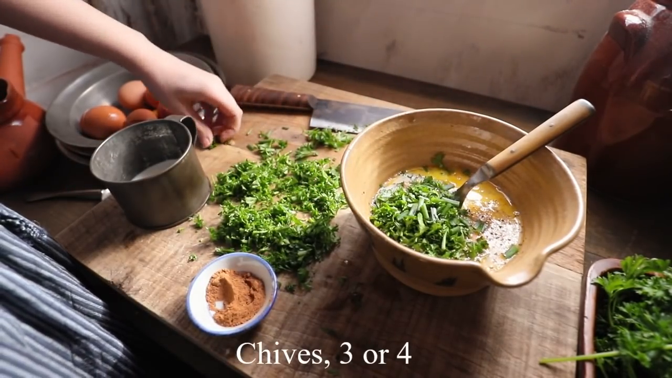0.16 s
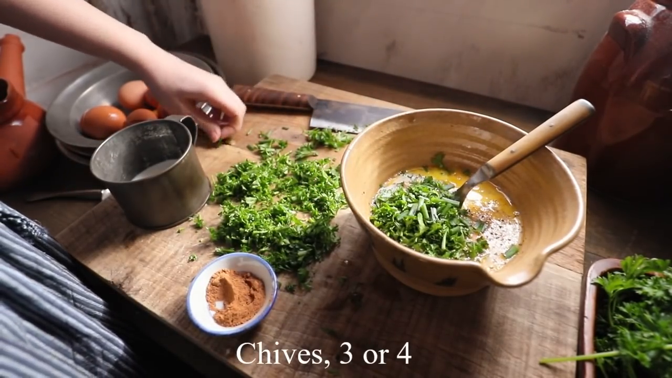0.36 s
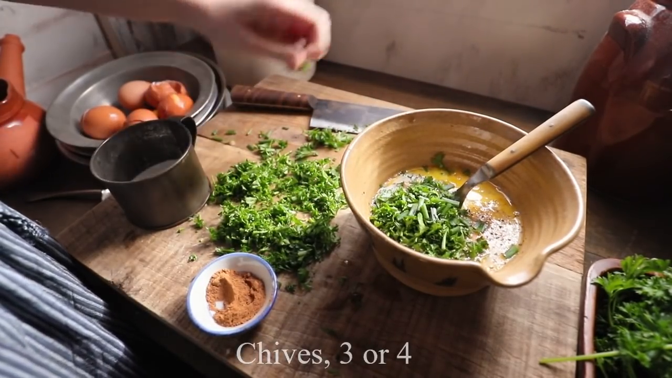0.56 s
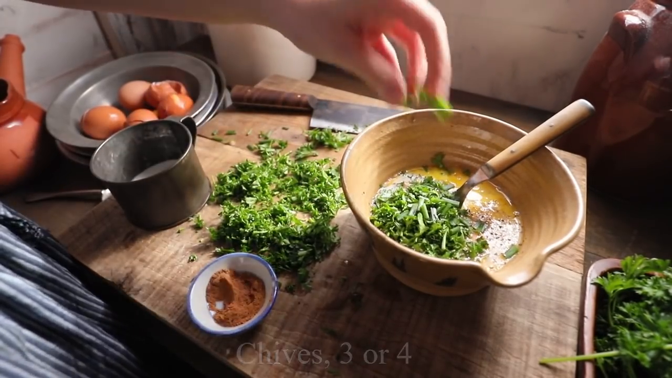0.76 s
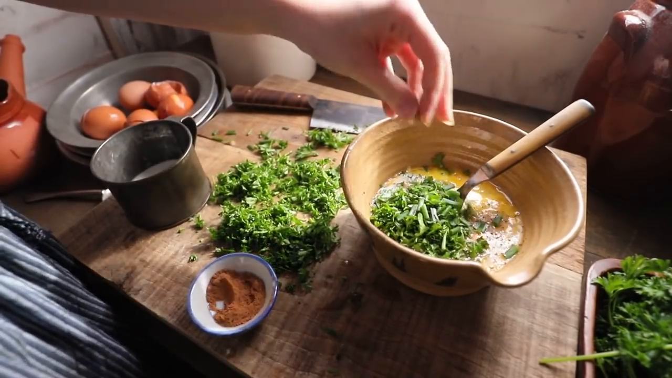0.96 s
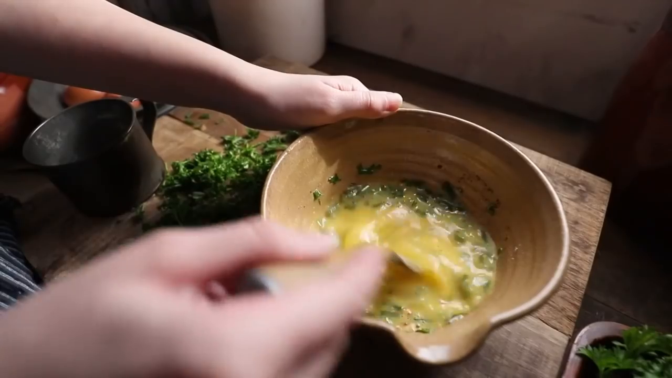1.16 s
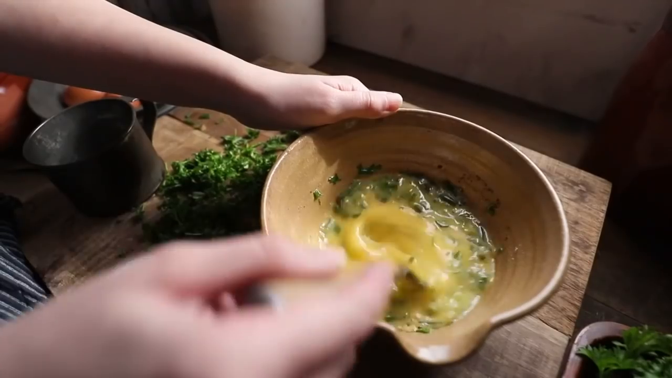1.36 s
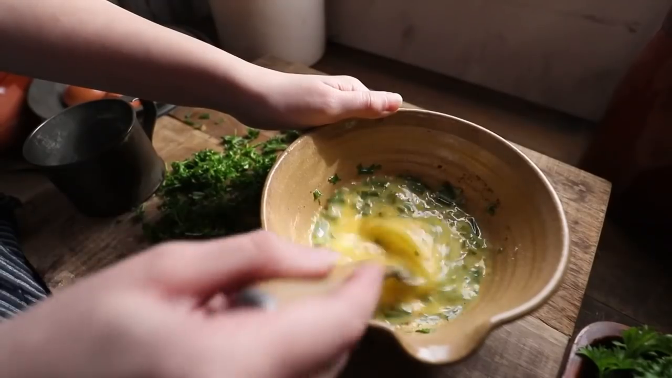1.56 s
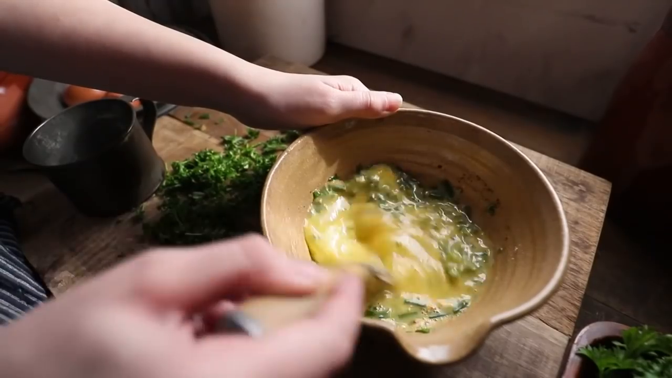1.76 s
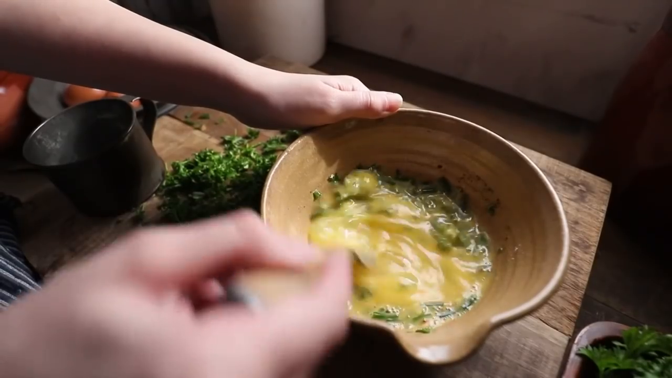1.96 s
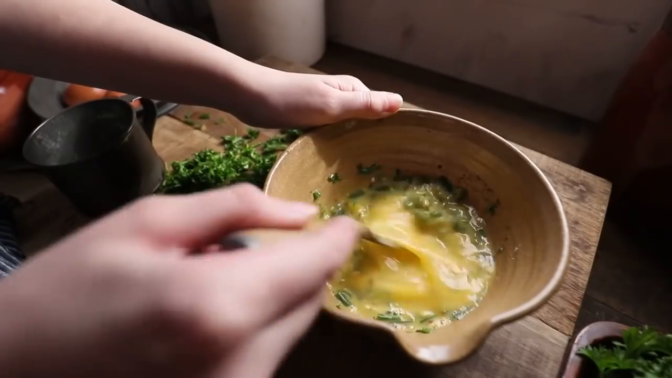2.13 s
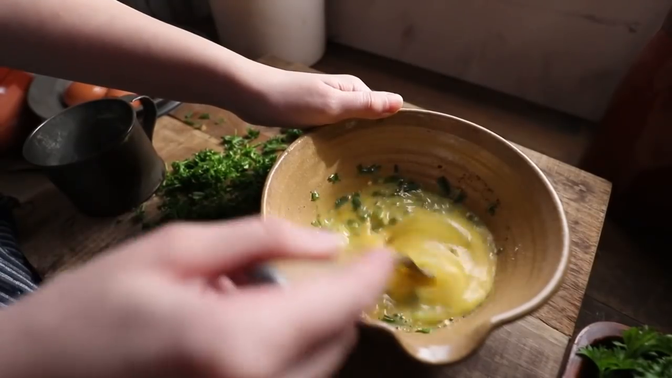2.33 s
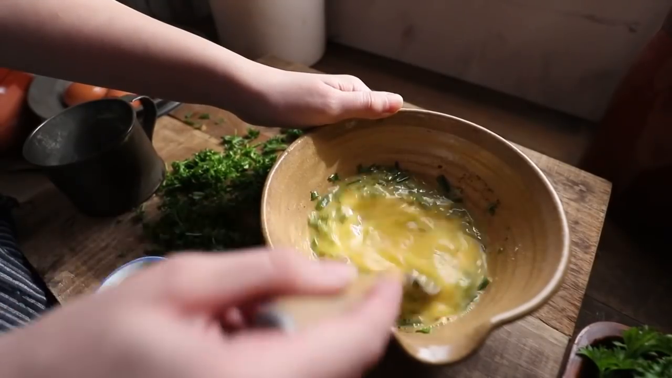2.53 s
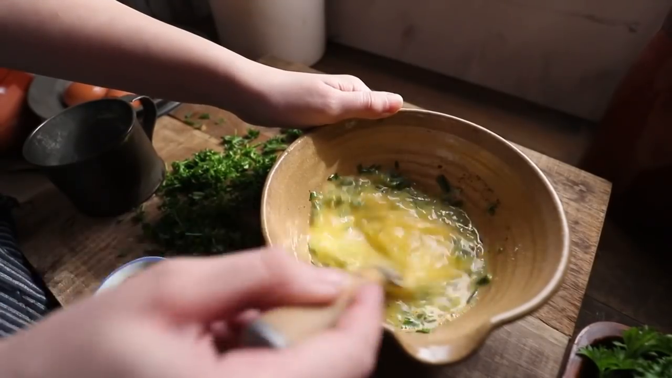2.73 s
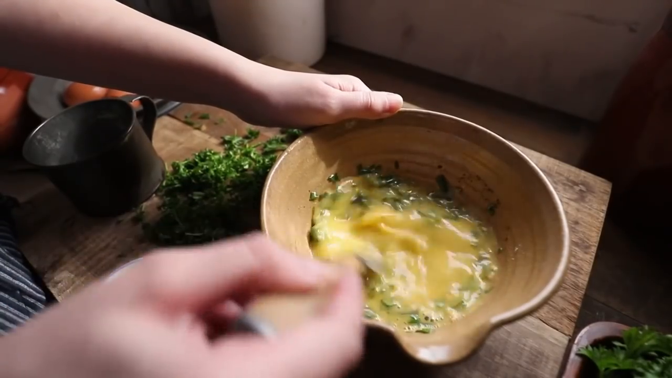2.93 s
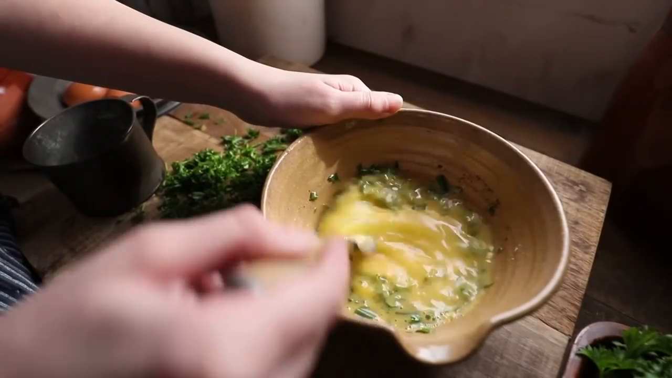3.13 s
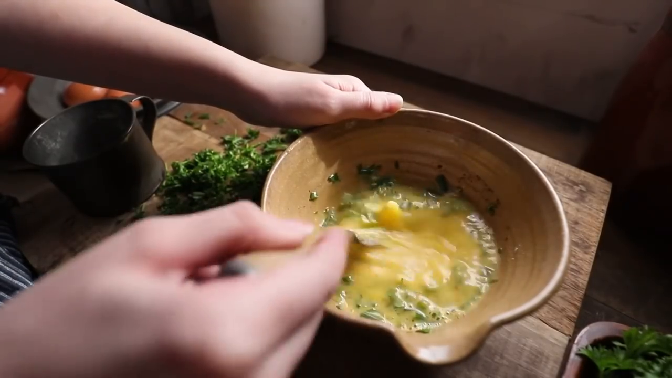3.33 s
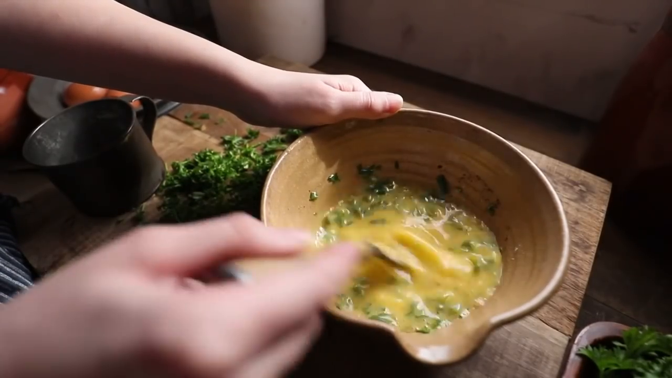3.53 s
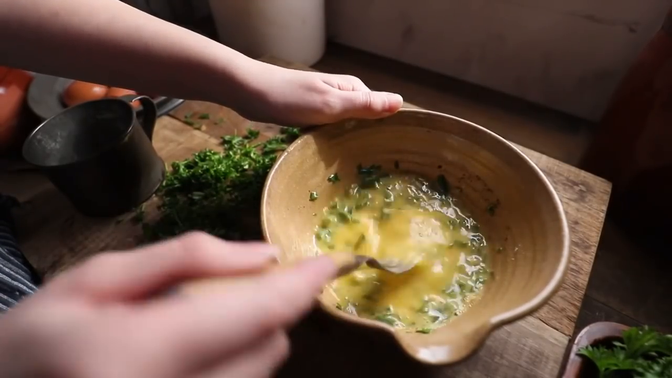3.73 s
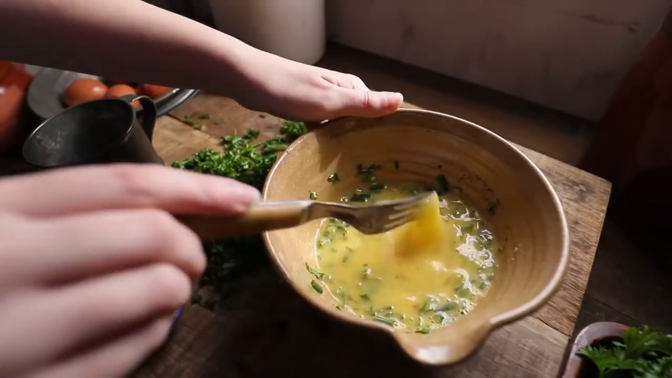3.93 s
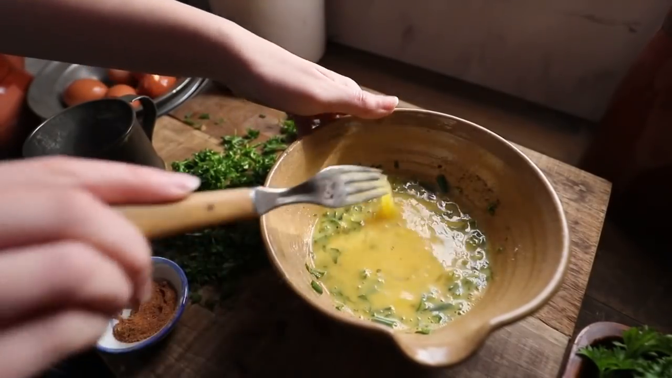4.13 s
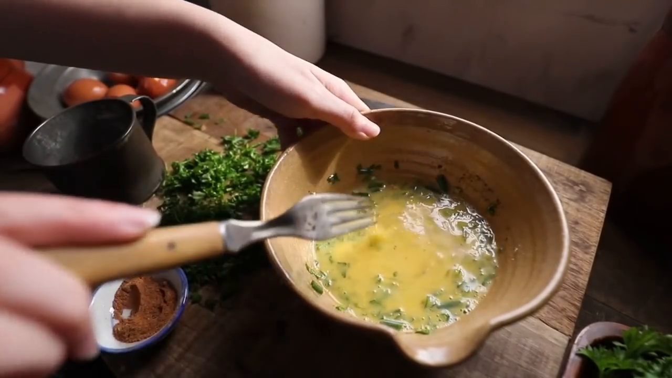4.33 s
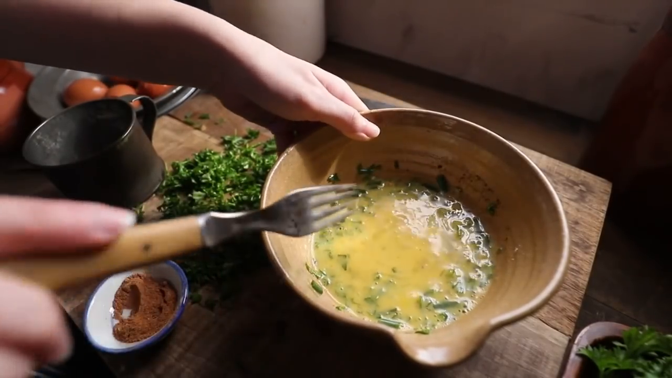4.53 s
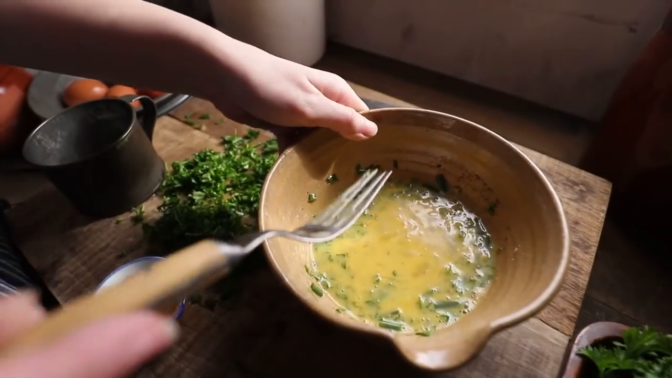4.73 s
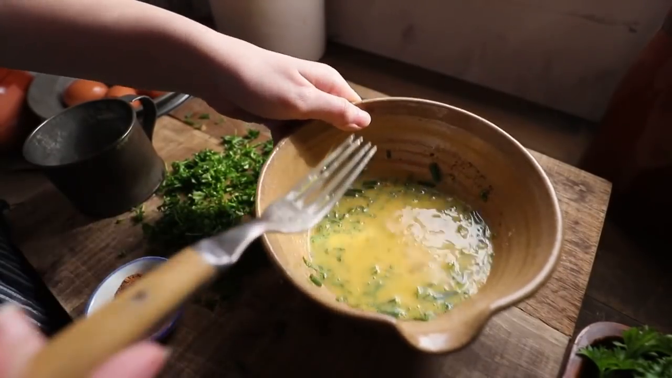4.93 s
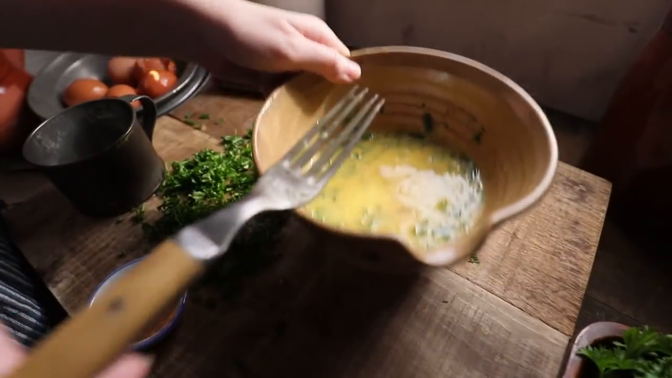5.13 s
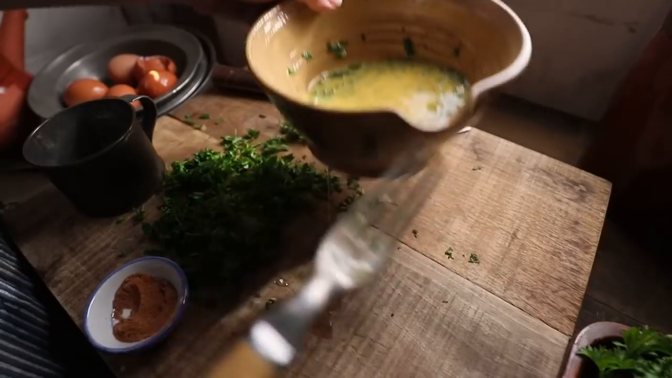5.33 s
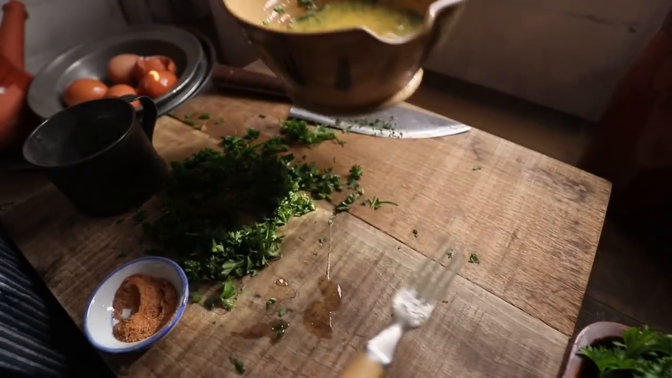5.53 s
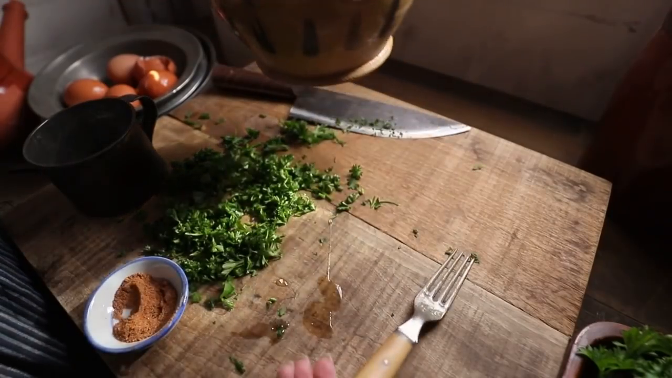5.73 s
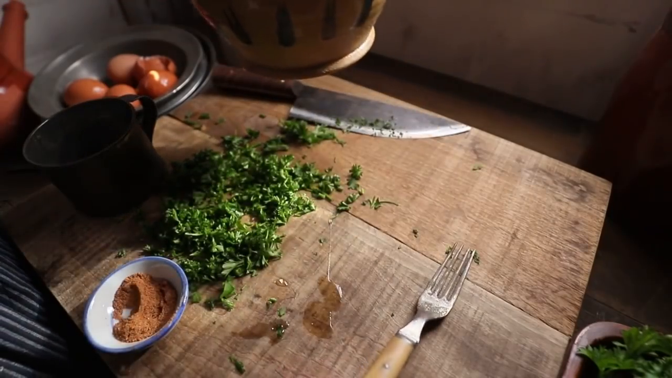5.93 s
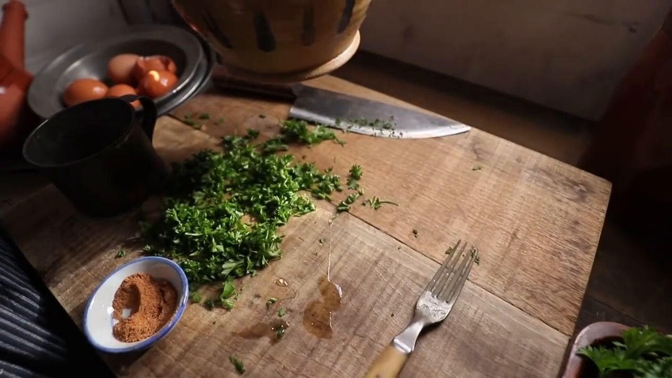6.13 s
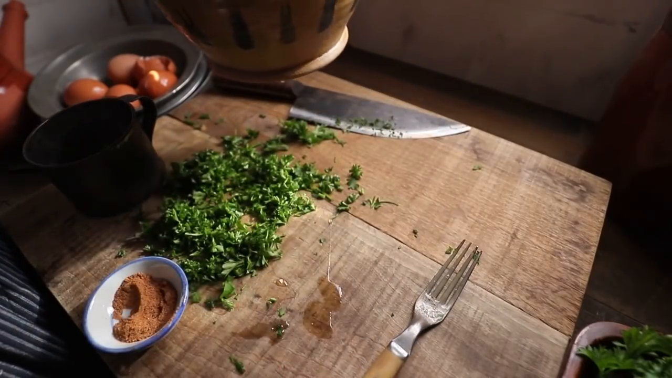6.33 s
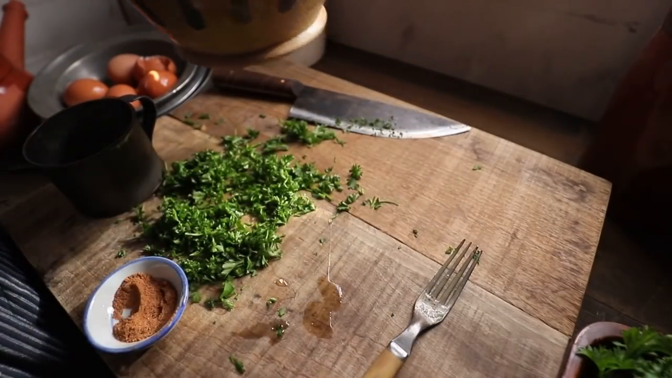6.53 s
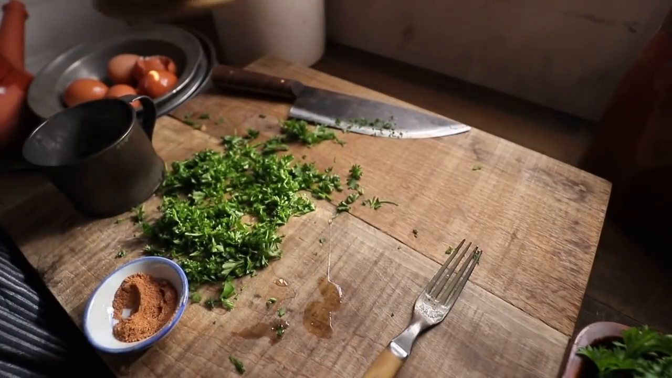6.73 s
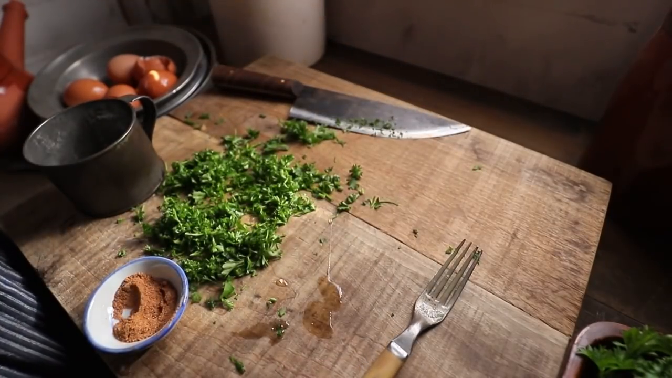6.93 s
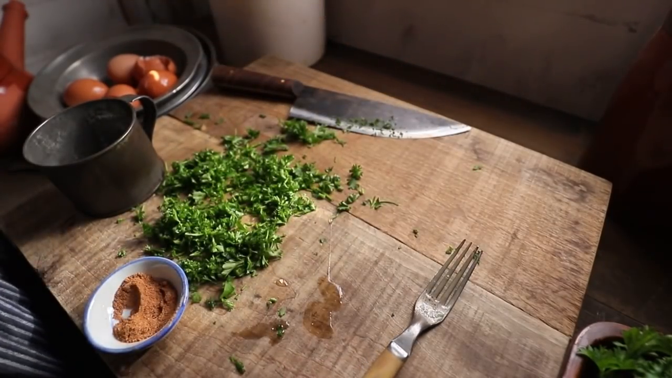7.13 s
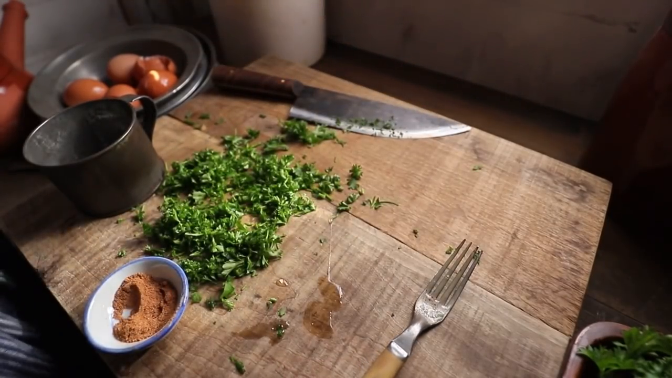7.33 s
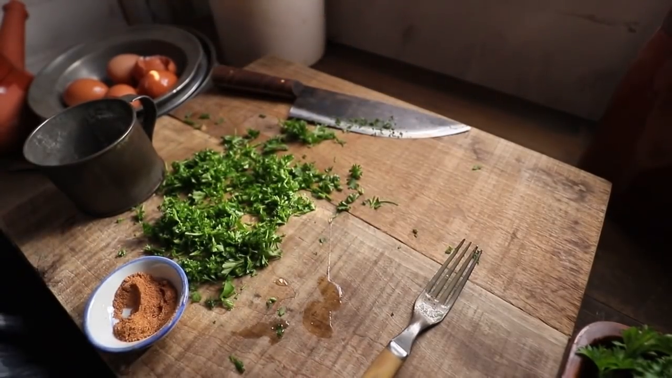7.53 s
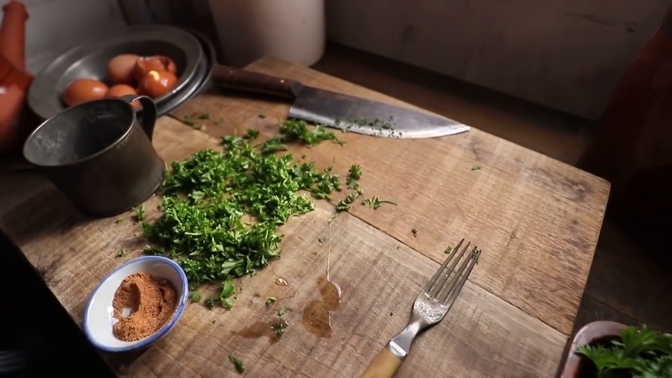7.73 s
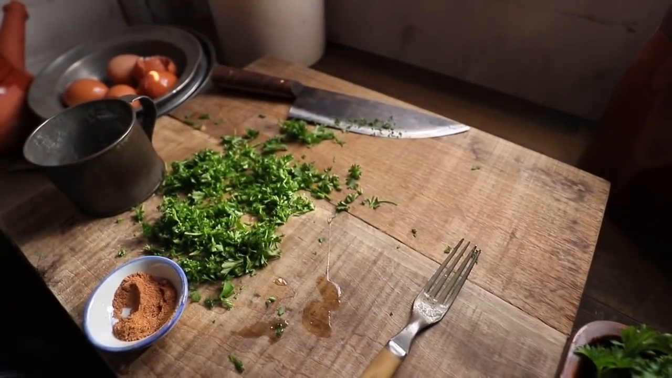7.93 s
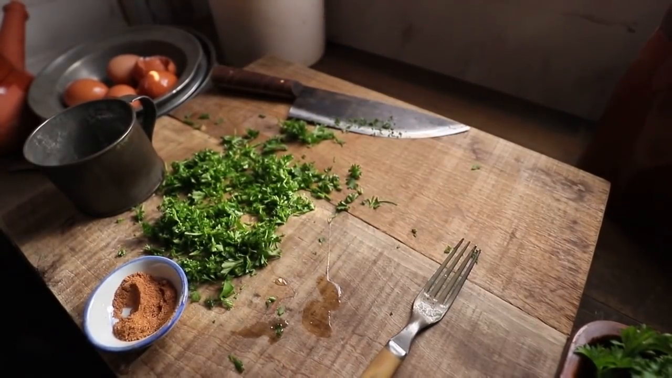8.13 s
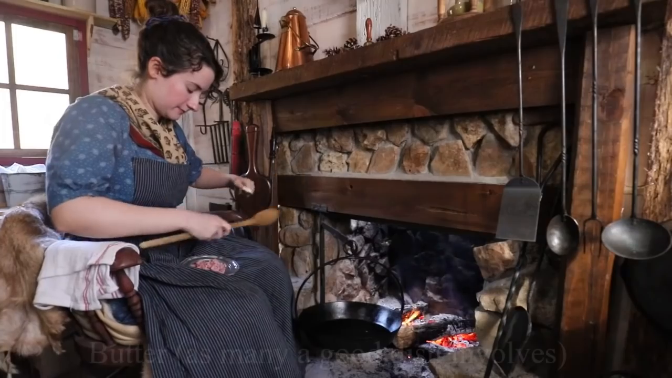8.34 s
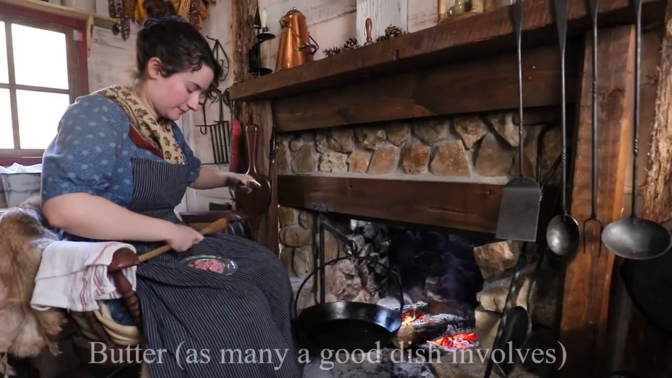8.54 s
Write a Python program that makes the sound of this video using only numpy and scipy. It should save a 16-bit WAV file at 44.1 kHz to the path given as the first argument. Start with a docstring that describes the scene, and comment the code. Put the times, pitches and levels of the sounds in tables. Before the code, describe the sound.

Quick clinks and scrapes of a fork whisking in a ceramic bowl, followed by the fork and bowl being put down on wood.

```python
"""A steel fork beats eggs in a stoneware bowl on a wooden board: the tines clink and scrape the glaze,
and the board thuds underneath. Later the bowl shifts, and fork and bowl are put down.
Blows ring the modes of bowl and board; scrapes drive resonances with gritty noise.
A hearth fire pops across the small kitchen, over dry ticks, soft swells of noise, rumble and hiss.
Twice the sound drops out briefly."""
import sys
import numpy as np
from scipy import signal
from scipy.fft import rfft, irfft, next_fast_len
from scipy.io import wavfile
from scipy.ndimage import uniform_filter1d

SR = 44100
rng = np.random.default_rng(int(sys.argv[2]) if len(sys.argv) > 2 else 0)


def transcribe(signal):
    """Save signal, clipped to [-1, 1], as a 16-bit WAV file at the path in sys.argv[1]."""
    frames = np.atleast_2d(signal).T
    limited = np.clip(frames, -1, 1)
    pcm = np.round(limited * 32767).astype(np.int16)
    wavfile.write(sys.argv[1], SR, pcm)


N = 382773

# modes of board and table: pitch_hz, level_db, t60_s
BOARD = [(73, -10, 0.096), (120, -2.5, 0.33), (143.5, 5.5, 0.32), (201.6, -5.5, 0.16), (270.6, 0, 0.13),
         (348.3, 6.5, 0.2), (443, -1, 0.21), (601, -6.5, 0.092), (802, -4, 0.36), (1113, 2, 0.13),
         (1484, 2.5, 0.066), (1670, 3, 0.057), (1810, -1.5, 0.023), (2310, 1, 0.028), (2750, -8.5, 0.03),
         (3160, -39, .03), (4450, -21, 0.021), (5360, -50, 0.027), (6600, -48, 0.019)]


def fork_clinks():
    """Steel cracks on glaze and rings bowl and fork; the push goes on into the board."""
    # start_s, ping_db, knock_db, thud_db, ring_db, low_accent_hz, high_accent_hz
    strikes = [(1.055, -29.5, -33, -32.5, -31, 1830, 11500), (1.0626, -59, -34.5, -48, -23, 1800, 7570),
               (1.0851, -37.5, -41, -48, -16, 4170, 8850), (1.2792, -23, -32.5, -38, -13, 4070, 8170),
               (1.2925, -44, -47, -32, -24, 5000, 7870), (1.3286, -29.5, -49, -34, -19, 4210, 7600),
               (1.3711, -32.5, -42, -63, -5, 3800, 8600), (1.4049, -44, -45.5, -56, -10, 4040, 6970),
               (1.5635, -36, -41.5, -63, -2, 4130, 10000), (1.5702, -32.5, -36.5, -68, -13, 4900, 11500),
               (1.5914, -32.5, -62, -63, -19.5, 4050, 11600), (1.6258, -37.5, -45, -64, -26, 1760, 7700),
               (1.7499, -24, -32, -33.5, -12, 1800, 8100), (1.7828, -28, -43, -44, -12, 3700, 7600),
               (1.8462, -31.5, -32, -46.5, -18, 1770, 11700), (2.0271, -30.5, -39.5, -50, 2, 3660, 7350),
               (2.0978, -45, -38, -58, -11, 1270, 7320), (2.26, -28, -42.5, -53, -26, 1660, 7700),
               (2.3334, -36, -42, -53, -24, 1680, 13200), (2.3485, -53, -47, -54, -30, 4000, 8200),
               (2.5441, -30.5, -36, -64, -15, 2150, 7700), (2.5594, -52, -38.5, -63.5, -21.5, 1960, 8000),
               (2.6826, -18, -33, -33, -24, 4000, 12100), (2.6891, -31, -35, -39, -4, 1850, 7710),
               (2.7105, -39.5, -42, -38.5, -7, 2020, 11800), (2.916, -49, -48, -55, -17.5, 4080, 6700),
               (2.9374, -31, -32, -42, -13, 1800, 10800), (2.9453, -37, -40, -51, -18, 2050, 7790),
               (2.9627, -31, -42, -50, -17, 1670, 7500), (3.0695, -36, -32, -34.5, -7, 2610, 11500),
               (3.2065, -33.5, -40.5, -52, -16, 2060, 7400), (3.2806, -29.5, -37.5, -55, -13, 4630, 7500),
               (3.3944, -26, -28, -30.5, -13.5, 1713, 8570), (3.4401, -30, -31, -55, -18, 2020, 7100),
               (3.448, -29.5, -47, -48, -18, 3880, 7500), (3.5013, -43, -48, -49, -16, 1890, 7430),
               (3.519, -45.5, -50.5, -62, -16, 3620, 6960), (3.6269, -25, -29, -33.5, -17, 2020, 9000),
               (3.6359, -48, -42, -30, -13, 3900, 10200), (3.6444, -54, -44.5, -36, -26, 1830, 8730)]
    # modes of the struck bowl and fork: pitch_hz, level_db, t60_s
    bowl = [(366, -5.5, 0.088), (634.7, -4, 0.16), (1000, -5.5, 0.073), (1250, -2, 0.018), (1780, 4, 0.018),
            (2030, -1, 0.057), (2610, -1, 0.038), (3300, -5.5, 0.035), (3700, -4, 0.02), (3980, 2.5, 0.049),
            (4360, -2, 0.021), (5020, 3, 0.045), (5350, -20, .07), (6955, -13, 0.028), (7350, -5.5, 0.013),
            (7710, 0.5, 0.035), (8170, -4, 0.03), (8850, 0, 0.022), (9400, -8.5, 0.07), (10200, -6, 0.033),
            (10750, -5.5, 0.058), (11670, 2.5, 0.019), (13800, -8.5, .04), (13420, -16.5, 0.042),
            (15900, -9, .03)]
    out = np.zeros(N)
    for start_s, ping_db, knock_db, thud_db, ring_db, *accents_hz in strikes:
        low_db = knock_db + 0.33 * (thud_db - knock_db) - 2.5
        presence_db = (ping_db + knock_db) / 2 - 6 + 7 * (accents_hz[0] > 2800)
        clink = struck_modes(bowl, [900, 2800, 6000], [low_db, knock_db, presence_db, ping_db],
                             accents_hz, ring_db, clack_s=0.017, chatter_s=0.012, soft=0.22, size=3200)
        add(out, start_s, clink)
        add(out, start_s, np.diff(crack(ping_db - 7, t60_s=0.016)))
        thud = struck_modes(BOARD[1:5], [], [thud_db], [], ring_db=0,
                            clack_s=0.034, chatter_s=0.0015, soft=0.97, size=8000)
        add(out, start_s + 0.0043, thud)
    return out


def glaze_scrapes():
    """Tines slip in gritty clumps and shake the bowl, whose colour shifts as the contact travels."""
    # start_s, length_s, treble_db, body_db, knee_fraction,
    # start_pressure_db, end_pressure_db (both against the knee), squeak_start_hz, squeak_end_hz
    strokes = [(1.088, 0.084, -31.5, -41.5, 0.28, -8, -16.5, 4270, 3700),
               (1.33, 0.067, -29, -42, .75, -4.5, -14, 4100, 3100),
               (1.591, .03, -32, -41.5, .4, -3, -10, 4100, 3300),
               (1.787, 0.085, -26.5, -38, 0.33, -1, -14, 4200, 3270),
               (2.03, 0.082, -27, -41, 0.04, 11, -17, 2420, 1610),
               (2.262, 0.079, -31, -40.5, .13, -10, -7, 2840, 2000),
               (2.545, 0.021, -34, -41.5, 0.7, -3, -2, 2080, 2050),
               (2.97, 0.091, -27, -36, 0.55, -9, -11, 2060, 2200),
               (3.2, 0.095, -28.5, -33.5, 0.44, -4, -7, 2450, 3400),
               (3.443, 0.016, -38, -37, 0.7, -8, -8, 2480, 2460),
               (3.502, 0.011, -31.5, -46, .4, -10, -15, 2320, 2320)]
    # resonances of the rubbed bowl and fork: pitch_hz, width_hz, level_db
    resonances = [(674, 41, -4), (1350, 54, -5.5), (1770, 320, -8.5), (2060, 110, -6), (2630, 290, -11.5),
                  (3020, 150, -13), (3313, 35, -10.5), (3650, 33, -9), (4050, 93, -5), (4835, 85, -12.5),
                  (5630, 58, -21), (7350, 207, 1.5), (7700, 32, -6.5), (8440, 300, -6), (9710, 15.6, -17.5),
                  (9840, 73, -16), (10300, 17, -24), (10700, 130, -26), (11400, 520, -17), (13200, 107, -8),
                  (13700, 140, -19), (14700, 280, -18)]
    out = np.zeros(N)
    for start_s, length_s, treble_db, body_db, knee, first_db, last_db, *squeaks_hz in strokes:
        end_s = start_s + length_s
        t = np.arange(start_s, start_s + 0.22, 1 / SR)
        hz = np.fft.rfftfreq(len(t), 1 / SR)
        clumps = unit_rms(uniform_filter1d(uniform_filter1d(rng.standard_normal(len(t)), 110), 110))
        slips = rng.standard_normal(len(t)) * gain_of(3.9 * clumps)
        slips *= 1 + .8 * (rng.random(len(t)) < .03)
        touch = np.interp(t, [start_s, start_s + 0.0033, end_s - .006, end_s], [0, 1, 1, 0])
        travel = np.interp(t, [start_s, end_s], [0, np.pi])
        pressure_db = np.interp(travel / np.pi, [0, knee, 1], [first_db, 0, last_db])
        mid_db = body_db + 0.45 * pressure_db  # the body feels pressure less than the treble
        presence_db = mid_db + 1.5 + 2 * (min(squeaks_hz) > 2900)  # a high squeak lifts its band
        bands_db = mid_db - 10.5, mid_db, presence_db, treble_db + pressure_db
        band = np.digitize(hz, [300, 900, 2800, 6000])
        for place in np.arange(3) * np.pi / 3:  # crossfade three spots along the stroke
            spot = rng.standard_normal((len(resonances), 2))
            bowl = sum(gain_of(db + 6.8 * lift) / (1 + 2j * (hz - f * (1 + 0.01135 * detune)) / width)
                       for (f, width, db), (lift, detune) in zip(resonances, spot))
            squeak_hz = np.interp(place, [0, np.pi], squeaks_hz)
            squeak = gain_of(-9) / (1 + 2j * (hz - squeak_hz) / 150)
            friction = touch * np.cos(travel - place) * np.roll(slips, round(2000 * place))
            for k, level_db in enumerate(bands_db, 1):
                colour = (bowl + squeak + gain_of(-25.5)) * (band == k)
                colour /= np.sqrt(np.mean(abs(colour) ** 2) * 1.47 * slips.var())
                add(out, start_s, irfft(rfft(friction * gain_of(level_db)) * colour, len(t)))
    return out


def board_knocks():
    """Things land on the board and ring its modes; the room answers the thump and the dull slap."""
    # start_s, thud_db, knock_db, clack_db, edge_db (against the clack), send_db,
    # low_accent_hz, high_accent_hz
    blows = [(0.066, -28, -35.5, -52, -6, 2, 616, 2750), (0.087, -20, -28, -55.5, -6, 3.5, 283, 2750),
             (0.198, -32, -29.5, -47, -4, 1.5, 498, 2750), (0.271, -33, -33.5, -42, -3, -6, 506, 2750),
             (0.322, -35, -44, -48.5, 4, -2, 450, 2750), (0.375, -25, -55, -60, 2, -2, 250, 2750),
             (0.57, -27.5, -64, -48.5, 6, 2, 250, 2750), (0.994, -18, -20, -56, -9, -10, 283, 2310),
             (3.071, -26.5, -29.5, -57, 4, -2.5, 268, 2750), (4.693, -46, -50.5, -67, -3, -3.5, 250, 2310),
             (5.798, -42, -30.5, -24.5, -2, -8.5, 1570, 4450), (5.812, -42, -38, -38, -6, -7, 1113, 1670),
             (5.825, -29.5, -40, -30, -8, -7.5, 1113, 1670), (5.838, -36, -36, -30, -4.5, -8, 1670, 2310),
             (5.856, -44, -42, -37, -3, -7, 1810, 2310), (5.876, -48, -30, -46, -3, -11, 348, 1810),
             (5.909, -43, -52, -65, 0, -5, 353, 2310), (6.421, -35, -19, -20.5, -9, -4, 802, 1670),
             (6.432, -40, -26, -28, -10, -5, 1113, 1484), (6.575, -39, -60, -56, -6, -12, 283, 1484),
             (7.362, -17, -29, -60, 5.5, -2.5, 270, 2750), (8.553, -44.5, -49, -63, -8, 2, 251, 1484),
             (8.588, -44, -66, -63, -1, -1, 250, 2310)]
    direct, send = np.zeros((2, N))
    lowpass = signal.butter(3, 2700, fs=SR)
    for start_s, thud_db, knock_db, clack_db, edge_db, send_db, *accents_hz in blows:
        mid_db = (knock_db + clack_db) / 2 - 10 + 10.5 * (650 < accents_hz[0] < 1300)
        bands_db = [thud_db, knock_db, mid_db, clack_db, clack_db + edge_db]
        blow = struck_modes(BOARD, [250, 650, 1300, 2100], bands_db, accents_hz, ring_db=-11,
                            clack_s=0.026, chatter_s=0.0057, soft=0.73, size=7000)
        thump = uniform_filter1d(blow[:600], size=30) * np.linspace(1, 0, 600)
        slap = crack(clack_db + 19 + .7 * send_db, t60_s=0.0033)
        add(direct, start_s, blow)
        add(send, start_s, gain_of(send_db) * thump)
        add(send, start_s, signal.lfilter(*lowpass, slap))
    return direct + kitchen_reverb(send)


def bowl_slide():
    """The bowl shifts: friction noise rubs the board's modes in one soft swell."""
    peak_s, width_s, level_db = 4.875, 0.036, -38
    hz = np.fft.rfftfreq(SR // 2, 1 / SR)
    t = np.arange(SR // 2) / SR - .25
    wood = sum(gain_of(db - 5.5 * np.log2(f / 350)) / (1 + ((hz - f) * t60_s / 14) ** 2)
               for f, db, t60_s in BOARD[4:])
    rub = unit_rms(irfft(rfft(rng.standard_normal(len(t))) * wood))
    out = np.zeros(N)
    add(out, peak_s - .25, gain_of(level_db) * np.exp(-(t / width_s) ** 2) * rub)
    return out


def fire_pops():
    """The fire snaps across the kitchen: a direct crack, then a wash of room."""
    # start_s, snap_db, room_db, tilt_db_per_octave, peak_hz
    pops = [(0.4887, -29.5, -30.5, 0, 2280), (2.3788, -21, -28.5, -.5, 400), (5.196, -25.5, -34, 2.5, 2740),
            (5.302, -35.5, -42.5, 0, 3000)]
    # colour of a snap: frequency_hz, density_db
    spectrum = [(88, -37.5), (150, -6.5), (334, -1), (637, -6), (774, -8.5), (1120, -8), (1760, -7.5),
                (3100, -8), (11900, -31), (16000, -41)]
    out, hz = np.zeros(N), np.fft.rfftfreq(SR // 2, 1 / SR)
    for start_s, snap_db, room_db, tilt, peak_hz in pops:
        burst, click = np.zeros((2, SR // 2))
        add(burst, .005, crack(0, t60_s=0.035))
        add(click, .005, [1])
        peak_db = 3.4 * np.exp(-(np.log((hz + 1) / peak_hz) / .25) ** 2)
        colour = gain_of(curve_at(spectrum, hz) + tilt * np.log2(hz / 2000 + 0.031) + peak_db)
        snap, tail = (irfft(rfft(x) * colour) for x in (burst, kitchen_reverb(click)))
        add(out, start_s - .005, gain_of(snap_db) * snap / snap[220:400].std())
        add(out, start_s - .005, gain_of(room_db) * tail / tail[:2500].std())
    return out


def dry_ticks():
    """Tiny crackles, each a wide band of noise around its pitch."""
    # start_s, drive_db, pitch_hz, t60_s
    ticks = [(0.26, -25, 11200, 0.019), (0.284, -22, 5300, 0.017), (0.16, -38, 8000, 0.012),
             (0.2, -36, 7000, 0.015), (0.3865, -28, 9500, 0.015), (0.4207, -27, 10200, 0.03),
             (0.9053, -40, 7400, 0.015), (0.93, -21, 4930, 0.018), (0.9663, -27.5, 10700, 0.024),
             (0.9794, -44, 11100, 0.017), (1.5229, -38, 11700, 0.015), (2.2278, -41, 7700, 0.017),
             (2.8874, -50, 9840, 0.015), (3.3694, -35, 8730, 0.0051), (3.7424, -63.5, 5670, 0.022),
             (3.872, -39.5, 7660, 0.015), (5.7194, -54, 6250, 0.015), (5.797, -20.5, 9000, 0.021),
             (7.5394, -58, 5050, 0.015), (8.2525, -47, 9230, 0.015), (8.394, -33, 5350, 0.017),
             (8.5054, -31, 7470, 0.04), (8.633, -39, 6600, 0.012)]
    out = np.zeros(N)
    for start_s, drive_db, pitch_hz, t60_s in ticks:
        burst = uniform_filter1d(uniform_filter1d(crack(drive_db, t60_s), size=6), size=5)
        add(out, start_s, burst * np.sin(2 * np.pi * pitch_hz * np.arange(len(burst)) / SR))
    return out


def swells_and_room_tone():
    """Soft swells of noise over rumble and hiss: rustling, and the room's wash after scrapes and pops."""
    # peak_s, rise_s_per_10_db, fall_s_per_10_db, level_db, crispness_db
    # (a negative rise or fall all but mutes the swell)
    swells = [(.08, 0.1, 0.14, -44.5, -13), (0.207, 0.07, 0.05, -39, -22), (0.286, -0.5, 0.03, -39, -4),
              (.33, -0.04, 0.12, -43, -7), (.42, 0.23, .02, -48, -0.5), (.6, 0.5, .2, -52, -10),
              (.985, 0.7, -0.02, -54.5, -3.5), (1.05, 0.11, 0.01, -46, -3.5), (2.4, 0.2, 0.16, -56.5, -2),
              (3.27, -0.14, .07, -53, -6), (3.95, 0.6, 1, -57, -18), (5.35, 0.35, 0.63, -53.5, -14),
              (5.9, 0.5, 0.3, -60, -13), (6.59, 0.33, 1.3, -56, -13), (7.08, 0.5, .7, -47.5, -20),
              (7.98, 0.6, 0.2, -63, -1)]
    # colour of the quiet kitchen: frequency_hz, density_db
    spectrum = [(15, -51), (25, -16), (124, -1), (214, -12.5), (280, -10.5), (433, -20), (496, -18),
                (651, -19.5), (927, -20.5), (1680, -23.5), (2270, -22), (3700, -30.5), (5130, -36.5),
                (14400, -40), (16500, -49.5)]
    # rumble below 300 Hz: time_s, level_db
    rumble = [(0, -25), (.06, -37), (.104, -28), (.21, -36), (.3, -29.5), (.41, -37), (.67, -33),
              (.84, -45), (.98, -42.5), (1.03, -51.5), (3.6, -46.5), (4, -49.5), (5.16, -51.5),
              (5.55, -48.5), (5.9, -50.5), (6.19, -46.5), (7.12, -47), (7.9, -51), (8.1, -50.5),
              (8.29, -60.5), (8.68, -47)]
    # steps of the noise floor, split at 4 kHz: start_s, mid_db, high_db
    floor_steps = [(0, -60, -61.5), (1.015, -62, -65.5), (8.215, -57.5, -60.5)]
    hiss_db = -76
    frames, bin_hz = N // 256 + 5, np.fft.rfftfreq(1024, 1 / SR)
    real, imag, patches = rng.standard_normal((frames, 513, 3)).T
    patches = unit_rms(uniform_filter1d(uniform_filter1d(patches, 14, 0), 8, 1))
    flicker = unit_rms(uniform_filter1d(rng.standard_normal(frames), size=3))  # uneven mids
    texture_db = 0.98 * patches + 1.2 * flicker * (abs(bin_hz[:, None] - 2000) < 1700)
    noise = signal.istft((real + 1j * imag) * gain_of(texture_db), nperseg=1024, noverlap=768)[1][:N]
    size = 2 * next_fast_len(N // 2 + 1)
    hz = np.fft.rfftfreq(size, 1 / SR)
    coloured = rfft(noise, size) * gain_of(curve_at(spectrum, hz))
    low, high = 1 / (1 + (hz / 300) ** 4), 1 / (1 + (4000 / (hz + 1)) ** 6)
    bands = [unit_rms(irfft(coloured * share, size)[:N]) for share in (low, 1 - low - high, high)]
    t = np.arange(N) / SR
    step_s, *floor_db = np.transpose(floor_steps)
    power = gain_of(floor_db)[:, np.digitize(t, step_s[1:])] ** 2  # mid and high bands
    power[1] += gain_of(hiss_db) ** 2
    for peak_s, rise, fall, level_db, crispness_db in swells:
        near = slice(max(round((peak_s - 4 * rise) * SR), 0), round((peak_s + 4 * fall) * SR))
        swell_db = level_db - 10 * np.maximum((peak_s - t[near]) / rise, (t[near] - peak_s) / fall)
        power[:, near] += gain_of([swell_db, swell_db + crispness_db]) ** 2
    gains = gain_of(np.interp(t, *np.transpose(rumble))), *np.sqrt(power)
    return sum(gain * band for gain, band in zip(gains, bands))


def kitchen_reverb(x):
    """Sparse echoes of random sign build up, then die away, the treble first."""
    # reverb time: frequency_hz, t60_s
    decay = [(150, 0.38), (1000, 0.36), (2800, .33), (7300, 0.17), (15000, 0.11)]
    taps = np.zeros(SR // 2)
    at = np.arange(80, len(taps) - 20, 10)
    taps[at + rng.integers(0, 10, len(at))] = rng.choice([-1., 1.], len(at)) * np.minimum(at / 500, 1)
    hz, t, spectra = signal.stft(taps, SR, nperseg=256)
    tail = signal.istft(spectra * gain_of(-60 * t / curve_at(decay, hz)[:, None]), SR, nperseg=256)[1]
    return signal.oaconvolve(x, tail / np.linalg.norm(tail))[:len(x)]


def struck_modes(modes, edges_hz, bands_db, accents_hz, ring_db, clack_s, chatter_s, soft, size):
    """One blow: modes clack while the contact damps them, then ring on; bands_db sets the first 12 ms."""
    hz, db, t60_s = np.transpose(modes)[:, :, None]
    t = np.arange(size) / SR
    spot, detune, phase, split = rng.standard_normal((4, len(modes), 1))
    # the place that is struck favours some modes
    db = db + 3 * spot + sum(9.5 * np.exp(-(np.log(hz / f) / 0.0614) ** 2) for f in accents_hz)
    clack = gain_of(-60 * t / (clack_s + 3.5 / hz))  # low modes clack for longer
    beats = 1 + hz / (hz + 2500) * np.cos(2 * np.pi * (.025 * hz * split * t + spot))  # close mode pairs
    ring = beats * gain_of(ring_db - 60 * t / t60_s)
    rise = 1 - np.exp(-t * hz / soft)  # a soft contact needs more cycles to build up
    sines = np.sin(2 * np.pi * (hz * (1 + 0.0095 * detune) * t + phase))
    tones = gain_of(db) * rise * (clack + ring) * sines
    band = np.digitize(hz[:, 0], edges_hz)
    bands = np.array([tones[band == k].sum(0) for k in range(len(bands_db))])
    chatter = gain_of(-60 * t[:400] / chatter_s) * rng.standard_normal(400) * (rng.random(400) < .2)
    chatter[0] = 1  # the first touch
    bands = signal.fftconvolve(bands, chatter[None], axes=1)[:, :size]
    return gain_of(bands_db) @ (bands / bands[:, :530].std(1, keepdims=True))


def crack(level_db, t60_s):
    """A short burst of dying noise."""
    t = np.arange(1500) / SR
    return gain_of(level_db - 60 * t / t60_s) * rng.standard_normal(len(t))


def gain_of(db):
    return 10 ** (np.asarray(db) / 20)


def unit_rms(x):
    return x / np.sqrt(np.mean(x ** 2) + 1e-20)


def curve_at(points, hz):
    point_hz, values = np.transpose(points)
    return np.interp(np.log(hz + 1), np.log(point_hz + 1), values)


def add(mix, start_s, sound):
    part = mix[round(start_s * SR):][:len(sound)]
    part += sound[:len(part)]


def scene():
    """Fork, bowl and board in front, the kitchen behind, in mono."""
    fork = fork_clinks() + glaze_scrapes()
    worktop = fork + gain_of(-21) * kitchen_reverb(fork) + board_knocks() + bowl_slide()
    return (worktop + fire_pops() + dry_ticks() + swells_and_room_tone())[None]


def record(dry):
    """A level curve with two brief dropouts, then a low-pass at 15.9 kHz."""
    # time_s, gain_db (ramped between points, held at both ends)
    level_curve = [(1.006, -8), (1.006, -41), (1.024, -42), (1.028, -34), (1.052, -4.5), (8.207, -7),
                   (8.214, -26), (8.222, -24), (8.233, -3.5)]
    gain = gain_of(np.interp(np.arange(N) / SR, *np.transpose(level_curve)))
    lowpass = signal.firwin(511, 15900, window=("kaiser", 9), fs=SR)
    return signal.oaconvolve(dry * gain, lowpass[None], "same")


dry = scene()
out = record(dry)
transcribe(out)
```